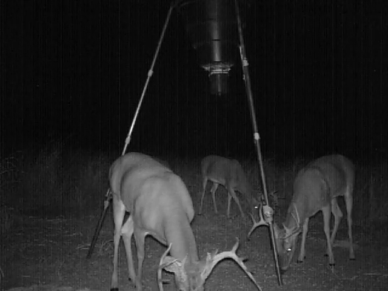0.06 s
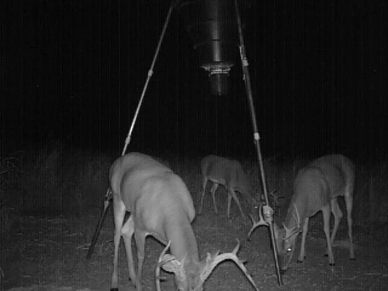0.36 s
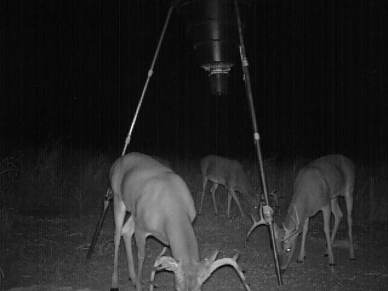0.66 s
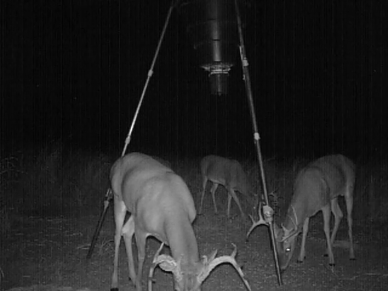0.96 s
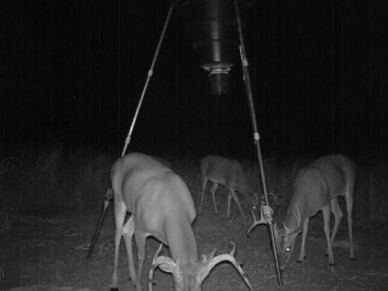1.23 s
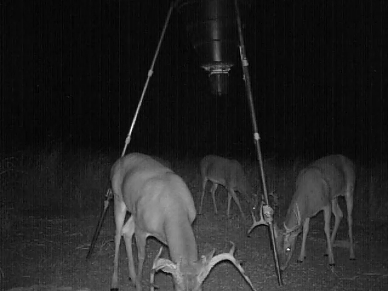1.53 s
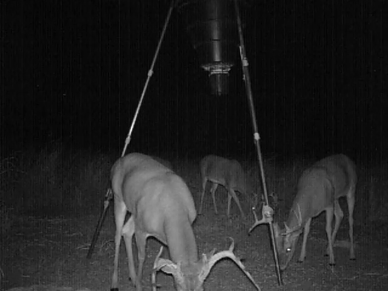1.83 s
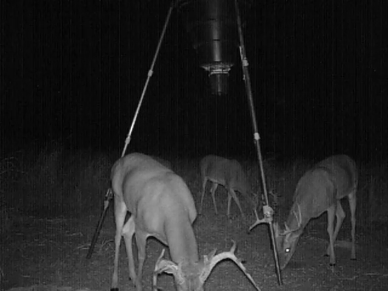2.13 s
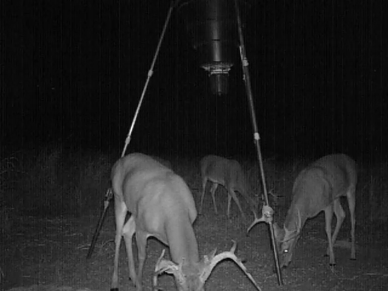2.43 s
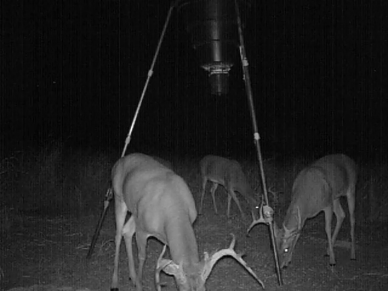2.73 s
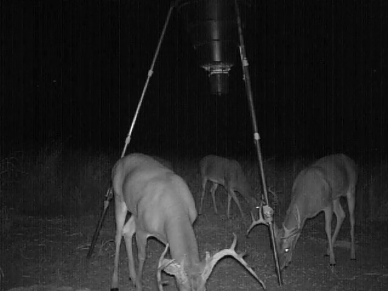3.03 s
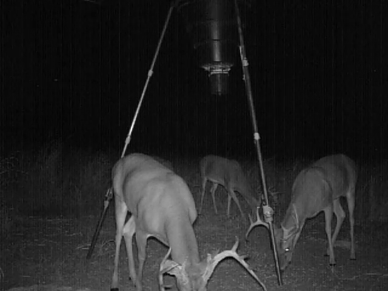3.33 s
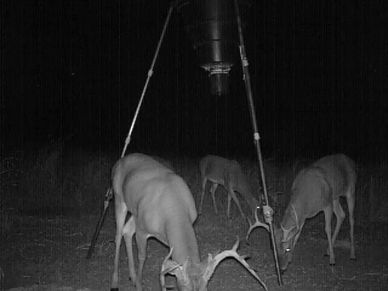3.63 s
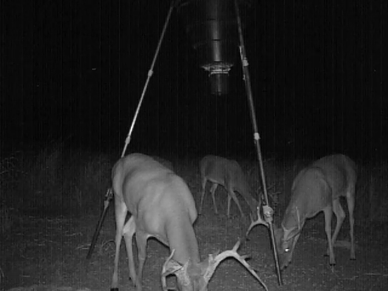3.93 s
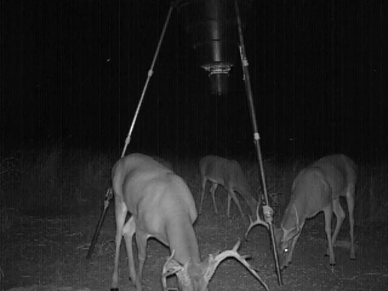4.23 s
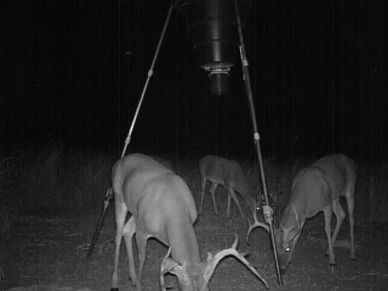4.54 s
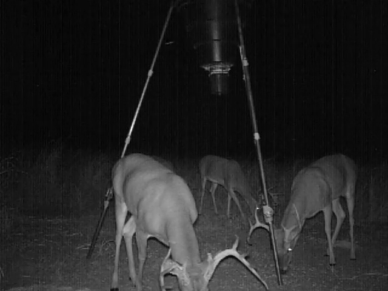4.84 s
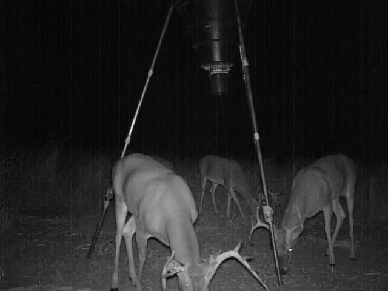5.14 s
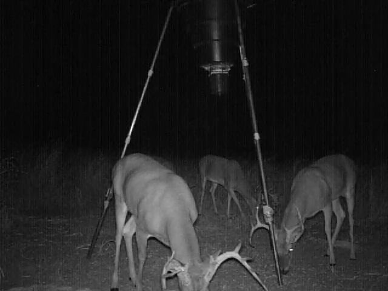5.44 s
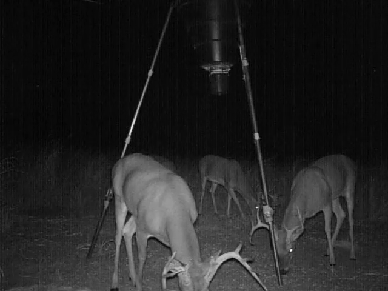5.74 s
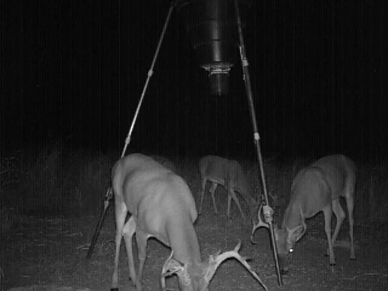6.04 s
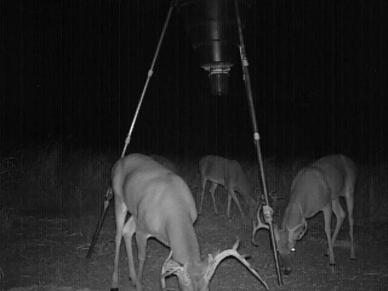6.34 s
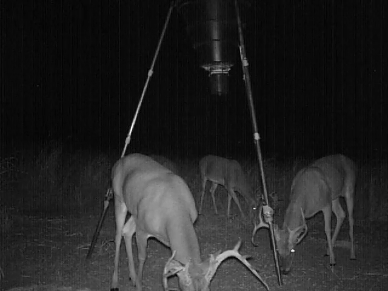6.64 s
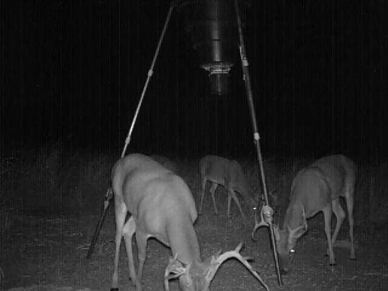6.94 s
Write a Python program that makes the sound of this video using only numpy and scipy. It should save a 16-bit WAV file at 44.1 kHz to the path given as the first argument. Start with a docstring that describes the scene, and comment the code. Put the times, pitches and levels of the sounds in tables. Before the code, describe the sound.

Night insects sound from start to finish in an open field, about seven seconds in all. A nearby cricket gives a high double chirp roughly every 0.6 seconds, with a few softer ones answering over a distant chorus and a steady, lower trill. A very faint, high katydid rasp pauses from about 2.8 to 3.5 seconds. Underneath run a deep rumble and a low hum, and distant air swells gently about every 1.2 seconds, like far wind turbine blades. The rumble rises in a brief gust near 5.4 seconds. Feeding deer make sparse, faint chewing ticks and crack dry kernels: small single snaps near 2.5, 4 and 4.4 seconds, a clearer cluster at 5, two more at 5.3 and 5.5, and another cluster around 6.6. The whole scene is quiet, with a soft microphone hiss and a faint, thin electronic whine behind it.

```python
"""Crickets in a night field

Near crickets call in pairs of falling wing strokes over a far chorus. A tree cricket trills, and a
small katydid shuffles high above, pausing once. Feeding deer crack a few dry kernels. Distant air
swells at an even pace, like far wind turbine blades, over a low rumble and a camera's faint whine."""
import sys
import numpy as np
from scipy import signal
from scipy.fft import rfft, irfft, next_fast_len
from scipy.io import wavfile
from scipy.ndimage import map_coordinates

SR = 44100
rng = np.random.default_rng(int(sys.argv[2]) if len(sys.argv) > 2 else 0)


def to_wav(sig):
    """Store sig (one row per channel, or 1-D mono) as 16-bit WAV at the path in sys.argv[1].

    Samples outside -1..1 are clipped; the rate is SR.
    """
    pcm = np.clip(np.atleast_2d(sig), -1, 1) * 32767
    pcm = np.round(pcm).astype(np.int16)
    wavfile.write(sys.argv[1], SR, pcm.T)  # frames by channels


N = 312669

# One row per insect: starting pitch f/Hz, stroke spacing t/s, level/dB, [call times t/s]
CRICKET_CALLS = [(4640, .073, -49.5, [.535, 1.046, 1.688, 2.262, 2.892, 3.411, 4.008, 4.527, 5.212, 5.693, 6.236, 6.821]),
                 (5000, .091, -57.5, [.085, .688, 1.952, 2.572, 3.208, 3.795, 4.385, 4.998, 5.54, 6.1]),
                 (4500, .089, -54, [1.159, 1.941]), (4720, .078, -56, [4.165, 5.345, 5.85])]


def near_crickets(accent_db=1):
    """The lead voices: each call is two wing strokes, with a slight accent on the second."""
    out = np.zeros(N)
    for hz, gap, db, times in CRICKET_CALLS:
        wing = wing_stroke(hz, length_s=.045, fall=.15)
        for s in times:
            add(out, s, amp(db + rng.normal(0, 0.34)) * wing)
            add(out, s + gap, amp(db + accent_db + rng.normal(0, 0.45)) * wing)
    return field_reverb(out, wet_db=-8.5, t60=.14)


def wing_stroke(hz, length_s, fall):
    """One wing closure: the tone swells, then sags and fades as the scraper slows along the file."""
    progress = clock(int(length_s * SR)) / length_s
    swell = np.sin(np.pi * progress ** .75) ** 2
    pitch_hz = hz * (1 - fall * progress ** 2.5)
    return swell * np.sin(2 * np.pi * np.cumsum(pitch_hz) / SR)


def far_crickets(count=21):
    """A bed of the same crickets, each on its own pitch and pace, blurred by distance."""
    out = np.zeros(N)
    for hz in np.linspace(4300, 4880, count):
        period_s = rng.uniform(.5, .65)
        for s in np.arange(rng.uniform(0, period_s), N / SR, period_s):
            gain = amp(rng.normal(0, 2))
            wing = gain * wing_stroke(hz * (1 + rng.normal(0, .01)), length_s=.04, fall=.14)
            add(out, s, wing)
            add(out, s + .08, wing)
    chorus = amp(-64.7) * unit(field_reverb(out, wet_db=-9, t60=.1))
    return chorus + amp(-67.5) * band(4490, width_hz=370) + amp(-68) * band(4566, width_hz=41)


# Fader ride on the trill: t/s, level/dB
TRILL_LEVEL = [(0, -61), (1.7, -60), (3.3, -61), (5.5, -63.5), (7.09, -63)]


def tree_crickets(period_s=.03341):
    """One steady trill of short falling strokes, in front of two blurred choruses."""
    out = np.zeros(N)
    for s in np.arange(.009, N / SR, period_s):
        wing = wing_stroke(2990 * (1 + rng.normal(0, .006)), length_s=.025, fall=.22)
        add(out, s + rng.normal(0, .0004), amp(rng.normal(0, .8)) * wing)
    trill = fader(TRILL_LEVEL) * unit(field_reverb(out, wet_db=-15, t60=.15))
    return trill + amp(-63.5) * band(2740, width_hz=103) + amp(-65) * band(3375, width_hz=154)


def katydid(strokes_per_s=20.055, stop_s=2.82, resume_s=3.47, fade_s=.03):
    """A high, raspy tone rubbed by long and short strokes in turn, with one pause."""
    t = clock()
    strokes = strokes_per_s * t
    swing = np.sin(np.pi * strokes) ** 2
    rub = np.where(np.floor(strokes) % 2, swing ** 1.2, swing ** .55)
    rasp_hz = 9230 + 125 * wobble(900)  # uneven file teeth shake the pitch
    wing = np.sin(2 * np.pi * np.cumsum(rasp_hz) / SR) * amp(2.2 * wobble(400))
    gate = np.clip(1 + np.maximum(stop_s - t, t - resume_s) / fade_s, 0, 1)
    return amp(-71) * gate * unit(rub * wing)


# Fader ride on the far buzz: t/s, level/dB
BUZZ_LEVEL = [(0, -76.5), (1.1, -73), (1.8, -68), (2.7, -83.5), (5.5, -83.5), (6, -75.5), (7.09, -75.5)]


def bush_cricket():
    """A thin, far-off buzz that drifts in and out."""
    return fader(BUZZ_LEVEL) * band(7050, width_hz=330)


# Kernel cracks: t/s, level/dB into the shell filter, centre f/Hz
KERNEL_CRACKS = [(2.536, -32.5, 6500), (3.9866, -27.5, 7560), (4.4026, -34, 7500), (4.9865, -25, 4800),
                 (4.9948, -25.3, 3800), (5.0004, -25.7, 4000), (5.045, -23, 4800), (5.275, -22.3, 3660),
                 (5.5087, -22.5, 3570), (6.545, -31, 4500), (6.592, -24.5, 4420), (6.602, -25.2, 4140),
                 (6.6319, -30.5, 4600), (6.6506, -29, 4500)]


def feeding_deer(nibble_count=6, nibble_db=-37, nibble_hz=5200):
    """Each kernel gives a brittle snap and a tiny puff of crumbs; faint chewing ticks fall at random."""
    out, t = np.zeros(N), clock(SR // 40)
    nibbles = [(s, nibble_db, nibble_hz) for s in rng.uniform(0, N / SR, nibble_count)]
    for s, db, hz in KERNEL_CRACKS + nibbles:
        snap = np.cos(2 * np.pi * hz * t) * np.exp(-t / .00012)
        crumbs = rng.standard_normal(len(t)) * (.2 * np.exp(-t / .0011) + .035 * np.exp(-t / .006))
        shell = signal.butter(2, [hz * .35, hz * 1.4], "band", fs=SR)
        add(out, s, amp(db) * signal.lfilter(*shell, snap + crumbs))
    return out


# EQ of the dark drone: f/Hz, relative level/dB
DRONE_EQ = [(30, -59), (240, -6), (330, 1), (500, -1.5), (560, -4.5), (640, -12), (900, -15.5), (2000, -66),
            (6000, -120)]
# EQ of the brighter rush: f/Hz, relative level/dB
RUSH_EQ = [(100, -57), (700, -2.5), (1150, 1), (1400, -2.5), (1750, -5.5), (1900, -8), (2120, -5),
           (2450, -11), (3300, -12.5), (6000, -44), (12000, -92)]
# Swells of the rush: peak t/s, boost/dB, half-width t/s
RUSH_SWELLS = [(.56, 4, 0.2), (1.62, 4, 0.25), (2.86, 5.5, 0.27), (3.87, 4.5, 0.27), (4.74, 3.5, 0.13),
               (5.7, 3, 0.26), (6.75, 3, 0.23)]


def distant_air(period_s=1.18, rise_db=4):
    """A drone swells evenly, like far turbine blades; a brighter rush keeps looser time."""
    t = clock()
    beats = sum(bump(t - s, width_s=.17) for s in np.arange(.56, N / SR, period_s))
    drone = amp(-46.5 + rise_db * beats + 0.87 * wobble(9)) * noise(DRONE_EQ)
    surge_db = sum(db * bump(t - s, width) for s, db, width in RUSH_SWELLS)
    rush = amp(-52.5 + surge_db + 0.64 * wobble(8.7)) * noise(RUSH_EQ)
    return drone + rush


# EQ of the rumble: f/Hz, relative level/dB
RUMBLE_EQ = [(4, -6.5), (11, -1), (16, 2.5), (23, 6), (32, -7.5), (42, -3.5), (60, -10.5), (130, -44),
             (500, -120)]


def rumble(gust_s=5.4, gust_db=6.5):
    """Sub-bass weight of the night air, with one short gust."""
    return amp(-34 + gust_db * bump(clock() - gust_s, width_s=.093)) * noise(RUMBLE_EQ)


# EQ of the low hum: f/Hz, relative level/dB
HUM_EQ = [(40, -13), (63, -12.5), (73, 1), (86, -6.5), (97, 1), (113, -11.5), (145, -11.5), (200, -18.5),
          (300, -31.5), (3000, -120)]
# Fader ride on the low hum: t/s, level/dB
HUM_LEVEL = [(0, -35.5), (1, -38), (1.7, -36), (3.7, -38), (4.9, -36), (5.8, -38.5), (7.09, -36)]
# Narrow hums: centre f/Hz, width f/Hz, pre-fader level/dB
NARROW_HUMS = [(467.1, 4.3, -55), (1703, 9.3, -65.5), (2063, 6.2, -74.5)]
# Fader ride on the narrow hums: t/s, gain/dB
NARROW_GAIN = [(0, -1), (2.3, -4.5), (3.8, -2), (6.3, -5.5), (6.8, 4), (7.09, 6)]


def far_hums(throb_db=1.17):
    """A low hum throbs unevenly under three narrow, wavering ones."""
    low = fader(HUM_LEVEL) * amp(throb_db * wobble(7)) * noise(HUM_EQ)
    narrow = sum(amp(db) * band(hz, width) for hz, width, db in NARROW_HUMS)
    return low + fader(NARROW_GAIN) * narrow


# Tones of the whine: f/Hz, level/dB ahead of the microphone EQ
WHINE_TONES = [(3114, -71), (5600, -83.5), (7400, -86), (9857, -90), (10059, -84), (10707, -94)]
# EQ of the hiss: f/Hz, relative level/dB
HISS_EQ = [(500, -6), (1500, -3), (2450, -5), (3300, -1), (3800, 5.5), (5300, 5), (5800, 3.5), (7100, 2),
           (7700, 0.5), (9500, 1), (10600, -6)]


def electronics():
    """The noise floor: the camera's hiss and thin, slightly unsteady whine."""
    whine = np.zeros(N)
    for hz, db in WHINE_TONES:
        phase = 2 * np.pi * hz * clock() + 0.36 * wobble(6.5)
        whine += amp(db) * np.sqrt(2) * np.sin(phase)
    return whine + amp(-60) * noise(HISS_EQ)


def field_reverb(x, wet_db, t60):
    """Grass and the tree line return a short diffuse tail."""
    t = clock(SR // 2)
    tail = rng.standard_normal(len(t)) * amp(-60 * t / t60)
    return x + amp(wet_db) * signal.fftconvolve(x, tail / np.linalg.norm(tail))[:N]


def amp(db):
    """Decibels to gain."""
    return 10 ** (np.asarray(db) / 20)


def unit(x):
    """Scale to rms 1."""
    return x / np.sqrt(np.mean(x ** 2) + 1e-20)


def clock(length=N):
    """Seconds for each sample."""
    return np.arange(length) / SR


def fader(points):
    """Gain for each sample from (t/s, level/dB) points."""
    return amp(np.interp(clock(), *np.transpose(points)))


def bump(t, width_s):
    """A bell of height 1 around t = 0."""
    return np.exp(-.5 * (t / width_s) ** 2)


def wobble(rate):
    """Smooth random modulation, rate knots a second."""
    return map_coordinates(rng.standard_normal(int(N * rate / SR) + 4), [clock() * rate])


def filtered(x, response):
    """Shape x with a gain that depends on frequency."""
    size = next_fast_len(N + SR // 2)
    return irfft(rfft(x, size) * response(np.fft.rfftfreq(size, 1 / SR)), size)[:N]


def noise(eq):
    """Noise of rms 1, coloured by (f/Hz, level/dB) points."""
    f, db = np.transpose(eq)
    white = rng.standard_normal(N)
    return unit(filtered(white, lambda hz: amp(np.interp(np.log(hz + 1), np.log(f), db))))


def band(centre_hz, width_hz):
    """Noise of rms 1 in one resonance, 6 dB down at width_hz to either side."""
    white = rng.standard_normal(N)
    return unit(filtered(white, lambda hz: 1 / (1 + ((hz - centre_hz) / width_hz) ** 2)))


def add(track, s, sound):
    """Mix a sound into the track at time s."""
    start = int(np.clip(round(s * SR), 0, N))
    track[start:start + len(sound)] += sound[:N - start]


def scene():
    """The mono mix: insects and deer over the night air and the noise floor."""
    insects = near_crickets() + far_crickets() + tree_crickets() + katydid() + bush_cricket()
    return (insects + feeding_deer() + distant_air() + rumble() + far_hums() + electronics())[None]


# Microphone treble, a small lift and then a steep roll-off: f/Hz, gain/dB
MICROPHONE_EQ = [(9800, 0), (10700, 1.5), (11400, -6.5), (12100, -20)]


def record(dry):
    """The microphone dulls the top octave; the camera keeps nothing above its band limit."""
    limit_hz = 12300
    f, db = np.transpose(MICROPHONE_EQ)
    return filtered(dry[0], lambda hz: amp(np.interp(hz, f, db)) * (hz < limit_hz))[None]


dry = scene()
out = record(dry)
to_wav(out)
```